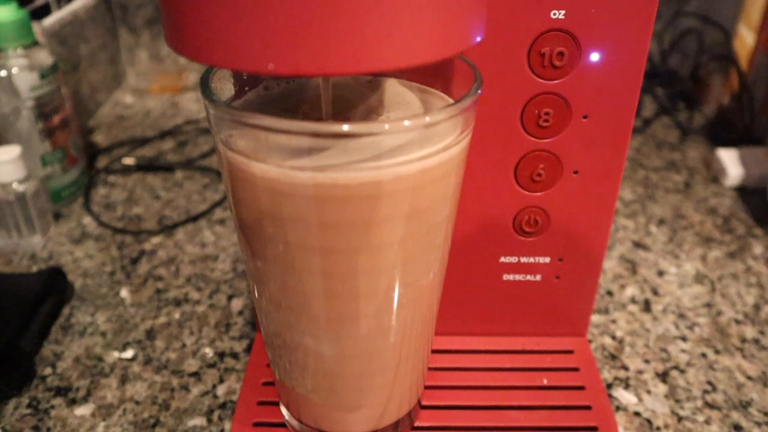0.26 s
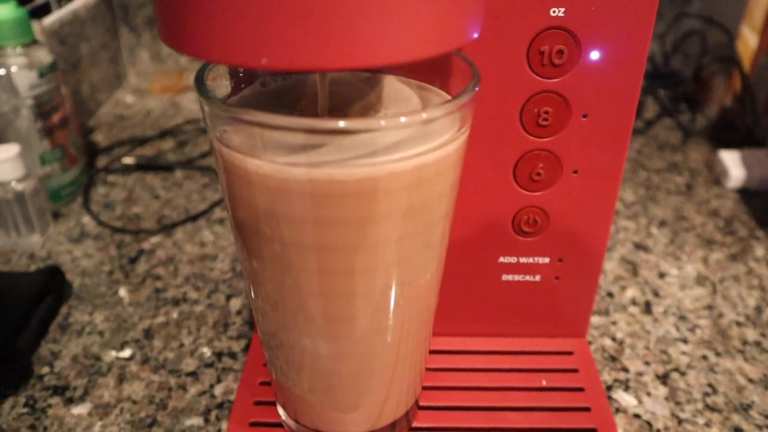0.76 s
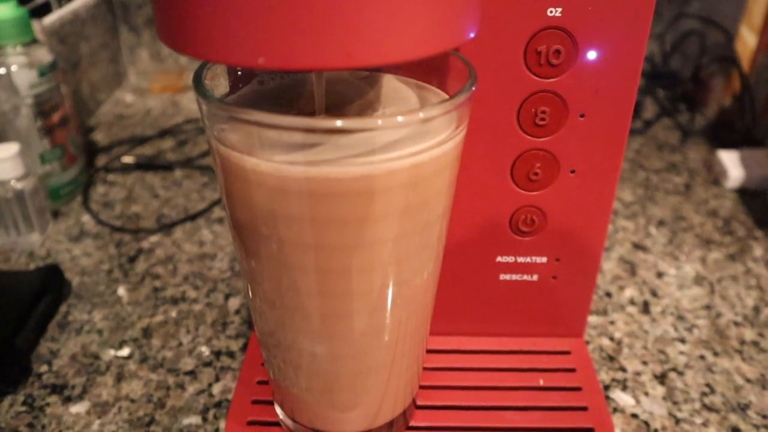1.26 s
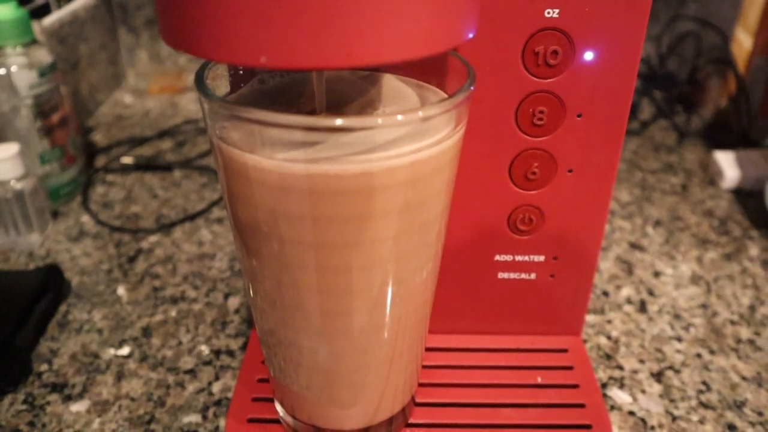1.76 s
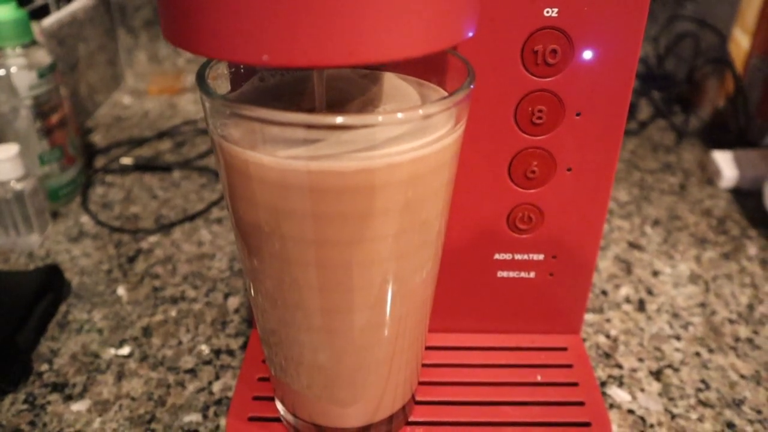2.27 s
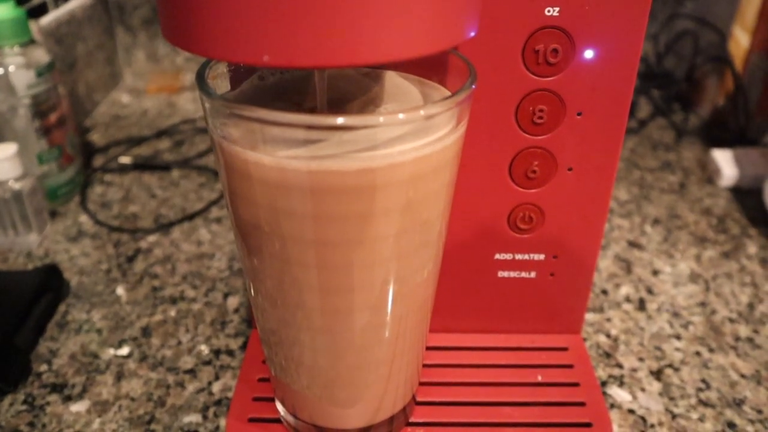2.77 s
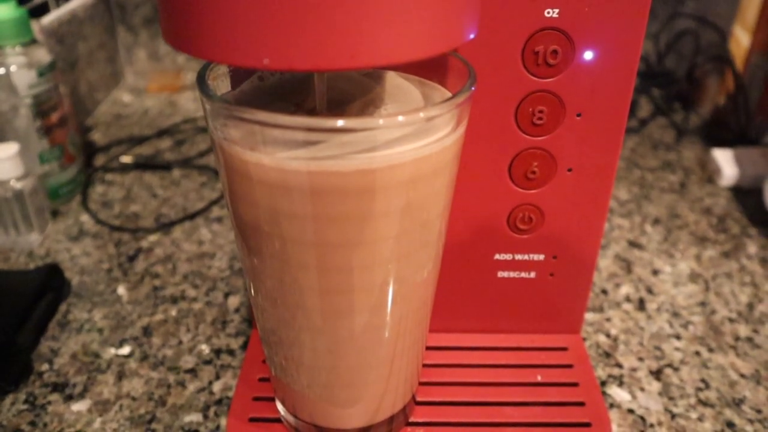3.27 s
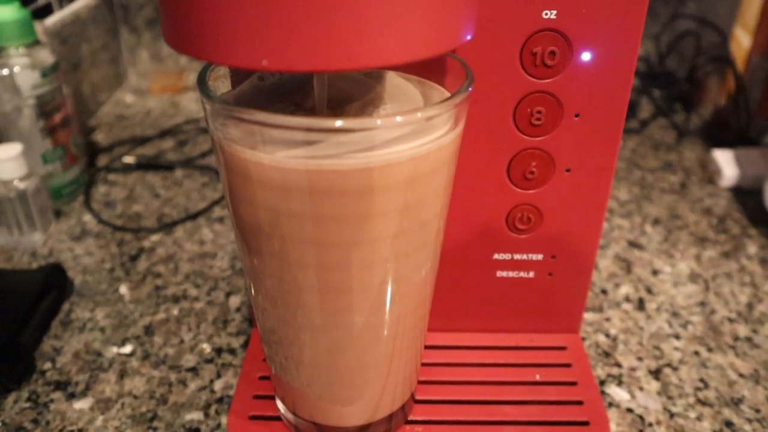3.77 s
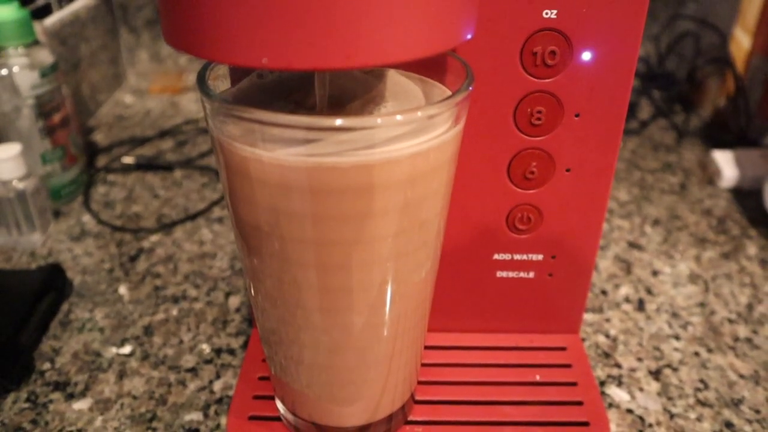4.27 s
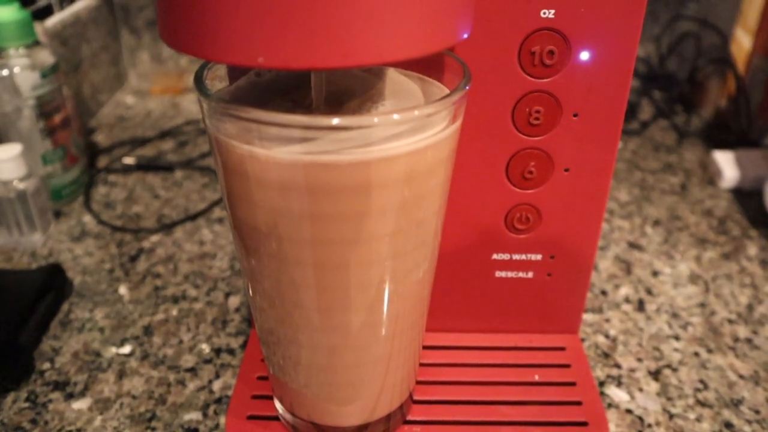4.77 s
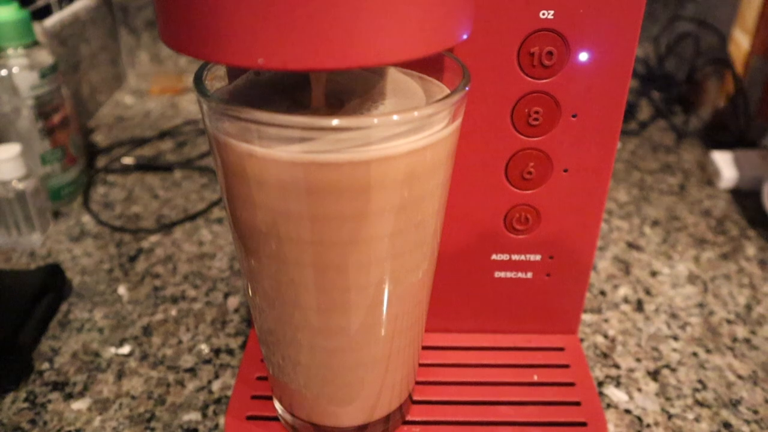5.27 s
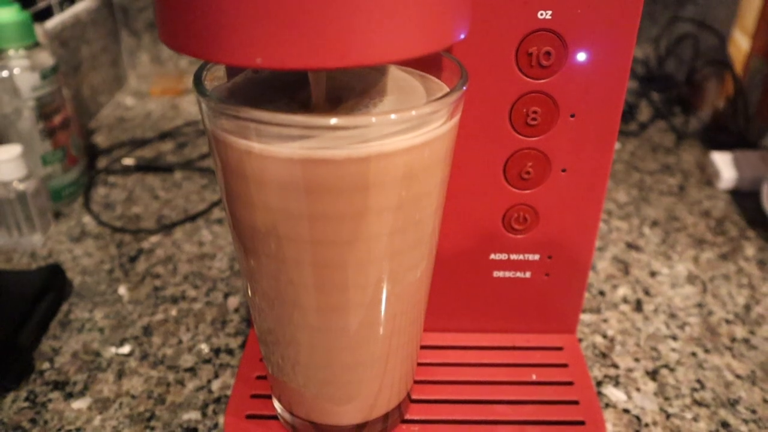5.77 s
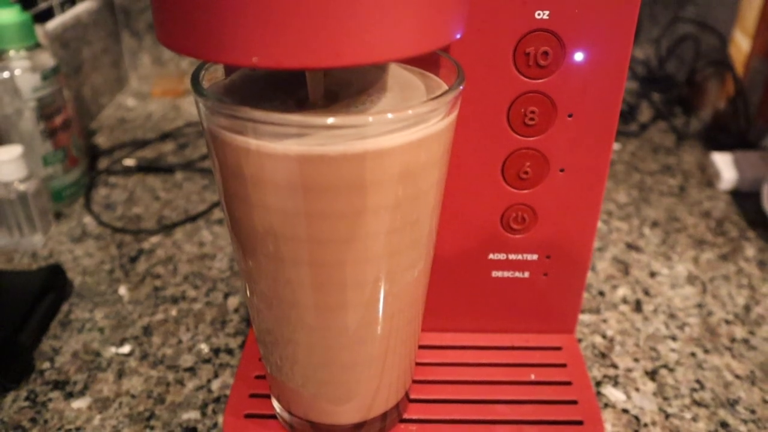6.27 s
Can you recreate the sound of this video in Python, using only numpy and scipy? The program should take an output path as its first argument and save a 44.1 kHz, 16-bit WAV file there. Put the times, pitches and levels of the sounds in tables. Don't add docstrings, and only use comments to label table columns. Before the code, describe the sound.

A small coffee machine fills a glass, heard very close in a lightly reflective kitchen. First comes a steady, low, buzzing pump with a fine plastic rattle, soft water wash and fridge hum, plus isolated clicks. Then a cluster of snaps stops it and an air pump surges in, buzzing and whining, with hissing breakthroughs. Bubbles gurgle hollowly and spits grow denser and louder, without a final stop.

```python
import sys
import numpy as np
from scipy import signal
from scipy.fft import rfft, irfft, next_fast_len
from scipy.io import wavfile

SR = 44100
rng = np.random.default_rng(int(sys.argv[2]) if len(sys.argv) > 2 else 0)


def nominal_scale(level):
    x = np.asarray(level, float) / 20
    return 10 ** x


def pcm_store(signal):
    levels = np.round(np.clip(np.atleast_2d(signal), -1, 1) * 32767)
    wavfile.write(sys.argv[1], SR, levels.astype(np.int16).T)


N = 287071
T = np.arange(N) / SR

# place_in_turn (0-1), level_db
AIR_STROKES = [(.40, 11.5), (.75, 4.5), (.06, -3)]
# centre_s, whistle_db, length_s, hollow_db
SPLUTTERS = [
    (3.558, -30.5, 0.024, -32),
    (3.668, -31.5, 0.013, -44),
    (3.758, -38, 0.014, -46),
    (4.908, -43.5, 0.084, -57),
    (5.768, -46, 0.0089, -36),
    (5.85, -57, 0.016, -49),
    (6.057, -63, 0.034, -47),
]
# pitch_hz, level_db
REFLECTED = [(50, -44), (120, -26), (300, -15), (800, -10), (1300, -7), (1900, -2), (2900, -8), (3600, -5),
             (12000, -5)]


def evened(x):
    return x / np.sqrt(np.mean(x ** 2) + 1e-20)


def read(points, hz):
    f, value = np.transpose(points)
    return np.interp(np.log(hz + 1), np.log(f + 1), value)


def play(rows):
    s, *columns = np.transpose(rows)
    return [np.interp(T, s, c) for c in columns]


def fade(start, stop, edge):
    return np.clip(np.minimum(T - start, stop - T) / edge, 0, 1)


def shape(x, gain):
    size = next_fast_len(N)
    spectrum = rfft(x, size) * gain(np.fft.rfftfreq(size, 1 / SR))
    return irfft(spectrum, size)[..., :N]


def colour(x, points):
    return evened(shape(x, lambda hz: nominal_scale(read(points, hz))))


def ring(x, hz, width):
    return signal.lfilter(*signal.iirpeak(hz, hz / width, SR), x)


def resonate(x, hz, width):
    turn = np.exp(2j * np.pi * np.cumsum(hz * np.ones(N)) / SR)
    r = np.exp(-np.pi * width / SR)
    return 2 * (turn * signal.lfilter([1 - r], [1, -r], x / turn)).real


def body(x, modes):
    return evened(sum((-1) ** k * nominal_scale(db) * ring(x, hz, w) for k, (hz, w, db) in enumerate(modes)))


def drift(rate):
    coarse = T[::100]
    hz = np.fft.rfftfreq(len(coarse), 100 / SR)
    spectrum = rfft(rng.standard_normal(len(coarse))) * (hz > 0) / (1 + (hz / rate) ** 2)
    return np.interp(T, coarse, evened(irfft(spectrum, len(coarse))))


def strokes(turns, pattern, scatter_db):
    hits = sum(nominal_scale(db) * np.diff(np.floor(turns - place), prepend=-1).clip(0, 1) for place, db in pattern)
    return hits * nominal_scale(scatter_db * rng.standard_normal(N))


def scattered(own):
    a, b, c = rng.standard_normal((3, N))
    return np.sqrt(1 - own) * a + np.sqrt(own) * np.array([b, c])


def puffs(hits, seconds, own=0):
    level = signal.lfilter([1], [1, -np.exp(-1 / (seconds * SR))], hits)
    return level * (scattered(own) if own else rng.standard_normal(N))


def orders(turns, multiples, levels_db, waver_db):
    return sum(np.sqrt(2) * nominal_scale(db + waver_db * drift(8.1)) * np.cos(2 * np.pi * (k * turns + rng.random()))
               for k, db in zip(multiples, levels_db))


def swells(rows, steady_db):
    t = T[::40]
    power = nominal_scale(steady_db) ** 2
    power = power + sum((nominal_scale(row[1]) * np.exp(-((t - row[0]) / row[2]) ** 2)) ** 2 for row in rows)
    return np.interp(T, t, np.sqrt(power))


def above_1700(x):
    dull = signal.lfilter(*signal.butter(2, 1700, fs=SR), x)
    return dull, x - dull


def water_pump():
    # start_s, turns_per_s
    shaft_speed = [(0.2, 25.01), (0.4, 24.83), (1.2, 24.49), (2.8, 23.98), (3.0, 24.25), (3.4, 24.92)]
    # multiples of the shaft speed, then their level_db
    multiples = [3, 6, 15, 16, 18, 20, 21, 23, 29, 30, 38]
    hum_db = [-48, -47, -55, -52.5, -63, -62, -49, -56.5, -57, -73, -65]
    # place_in_turn (0-1), level_db
    valves = [(.81, 0), (.46, -5.5), (.155, -6.5)]
    # pitch_hz, level_db (per Hz)
    wash_tone = [(88, -6), (150, -24), (193, -13), (505, -5.5), (991, -11.5), (1250, -15.5), (2550, -22),
                 (2920, -18), (4460, -31.5), (5300, -30), (11700, -47.5), (12900, -71), (15000, -91)]
    turns = np.cumsum(play(shaft_speed)[0]) / SR
    hum = orders(turns, multiples, hum_db, 0.36)
    hits = strokes(turns, valves, 0.19)
    knock = evened(ring(ring(hits + .03 * puffs(hits, .002), 1310, 300), 1310, 500))
    wash = colour(rng.standard_normal(N), wash_tone) * nominal_scale(0.29 * drift(9.9))
    running = fade(-1, 3.52, 0.058)
    return (hum + nominal_scale(-46) * knock) * running + nominal_scale(-43.5) * wash * (0.47 + 0.55 * fade(-1, 4.12, 0.42))


def rattle():
    # centre_s, level_db, length_s
    runs = [
        (.14, -53.5, 0.036),
        (.44, -52, 0.097),
        (.7, -57, 0.027),
        (1.2, -54, 0.062),
        (1.66, -56.5, 0.16),
        (2.24, -54.5, 0.21),
        (2.54, -57, 0.016),
        (3.17, -55, 0.12),
        (4.42, -57, 0.13),
    ]
    # pitch_hz, width_hz, level_db
    housing = [(1950, 210, -0.5), (2783, 18, 0.5), (2960, 126, -2), (4170, 190, -1), (4700, 43, -2),
               (5194, 280, -1.5), (5540, 110, -3.5), (5920, 370, -6.5), (7500, 2900, -14.5),
               (11750, 2900, -16)]
    ticks_per_s, steady_db, stop_s, flutter_db = 93, -54, 4.46, 1.2
    hits = strokes(np.cumsum(ticks_per_s * (1 + .03 * drift(15.))) / SR, [(0, 0)], 1.0)
    ticks = .75 * evened(puffs(hits, .0011, .9)) + .75 * evened(hits)
    ticks = ticks + (.25 + .6 * fade(3.4, 9, .2)) * scattered(.8)
    level = swells(runs, steady_db) * nominal_scale(-2.5 * fade(3.2, 9, 0.037)) * nominal_scale(flutter_db * drift(45.0))
    level *= 0.2 + 0.89 * fade(-1, stop_s, 0.024)
    return nominal_scale(4.5) * level * signal.lfilter(*signal.butter(8, 12000, fs=SR), body(ticks, housing))


def drone():
    # pitch_hz, level_db (per Hz)
    rumble_tone = [(11, -51), (18, -24), (32, -36), (59, 3.5), (91, -5), (114, 4.5), (129, -15), (172, -11),
                   (226, -10), (268, -13), (400, -14.5), (520, -63), (880, -120)]
    hum_hz, hum_db, rumble_db = 121.3, -41, -40.5
    hum = np.sqrt(2) * nominal_scale(hum_db + 0.11 * drift(2.4)) * np.cos(2 * np.pi * hum_hz * T)
    return hum + nominal_scale(rumble_db) * colour(rng.standard_normal(N), rumble_tone)


def clacks():
    # start_s, peak_db, pitch_hz, time_to_fall_60_db_s
    snaps = [(1.322, -18, 1920, 0.018), (1.3222, -19, 700, 0.013), (3.074, -18, 1950, 0.023),
             (3.333, -38, 1240, 0.033), (3.345, -41, 1290, 0.02), (3.358, -17, 1310, 0.1),
             (3.365, -14, 1250, 0.021), (3.406, -33, 1000, 0.013), (3.422, -35, 1240, .015),
             (3.438, -35, 1200, .015), (3.447, -23, 1000, 0.012), (3.456, -33, 1260, 0.012),
             (3.467, -40, 1000, .015), (3.474, -39, 1250, 0.012), (3.484, -16, 1350, 0.02)]
    out, t = np.zeros(N), np.arange(4000) / SR
    band = signal.butter(3, [800, 3000], "bandpass", fs=SR)
    for s, db, hz, t60 in snaps:
        crack = 2.8 * signal.lfilter(*band, rng.standard_normal(len(t)))
        tone = 1.4 * np.sin(2 * np.pi * hz * t)
        out[round(s * SR):][:4000] += nominal_scale(db - 14.0 - 60 * t / t60) * (tone + crack)
    return out


def spits_and_spray():
    # start_s, peak_db, low_db (body relative to the hiss)
    flicks = [(3.331, -37, -10), (3.3444, -47, -10), (3.3645, -39, -13), (3.4077, -48, -14),
              (3.483, -45, -14), (3.5204, -49, -10), (3.5538, -48, -8), (3.5778, -44, -13),
              (3.6451, -43, -10), (3.7444, -42, -12), (3.7833, -43, -19), (3.7973, -56, -10),
              (3.8224, -43, -10), (3.8669, -44, -12), (3.898, -54, -10), (4.0302, -44, -10),
              (4.0801, -42, -10), (4.2183, -48, -15), (4.2423, -52, -13), (4.356, -42, -12),
              (4.377, -51, -10), (4.3999, -44, -10)]
    # (body below 3 kHz, relative)
    spits = [(4.716, -45, -8), (4.771, -40, -5), (4.7938, -44, -6), (4.840, -50, -8), (4.863, -45, -12),
             (4.876, -39, -9), (4.956, -39, 3), (5.004, -33, -13), (5.02, -36, 8), (5.033, -37, 12),
             (5.047, -44, 16), (5.057, -40, 9), (5.088, -30, 6), (5.118, -31, 7), (5.196, -32, -3),
             (5.153, -30, 0), (5.205, -32, 7), (5.2344, -36, 0), (5.257, -24.5, 2), (5.359, -46, 0),
             (5.424, -28, 5.5), (5.428, -48, -14), (5.4504, -24.5, 2.5), (5.548, -32, 7), (5.554, -35, -9),
             (5.586, -58, -8), (5.6136, -29.5, 6.5), (5.62, -35, 6), (5.637, -27, -2), (5.662, -44, -8),
             (5.73, -58, -10), (5.7624, -16, -13), (5.766, -22, -14), (5.794, -28.5, 3.5),
             (5.8425, -32, -13), (5.856, -32, -10), (5.901, -33, -11), (5.942, -33, -12),
             (5.9896, -27.5, -18), (6.015, -37, 9.5), (6.035, -43, -2), (6.053, -32, 3), (6.066, -40, 7),
             (6.088, -27, -2), (6.1155, -27, -3), (6.1904, -20.5, -4), (6.2416, -35, -6),
             (6.257, -22.5, -12), (6.27, -32, -11), (6.345, -37, -5), (6.365, -39, 1), (6.411, -50, -8),
             (6.439, -37, -14), (6.452, -35, -13), (6.464, -44, -8)]
    # pitch_hz, level_db (per Hz)
    spit_tone = [(1760, -27), (3000, -6.5), (4600, -9), (5200, -2.5), (5900, -7.5), (7900, -15.5),
                 (10500, -12.5), (12500, -17.5), (15500, -30)]
    t60_s, shorter_per_db = 0.022, 0.1372
    drizzle_db, first_burst = -58, (5.095, -55, 0.074)
    high, low = np.zeros((2, N))
    for s, db, low_db in flicks + spits:
        t60 = t60_s * np.exp(-shorter_per_db * (db + 28.5))
        age = np.maximum(T[round(s * SR):][:8000] - s, 0)
        spit = nominal_scale(db - 60 * np.maximum(age - .002, 0) / t60) * np.minimum(age / 0.0013, 1)
        high[round(s * SR):][:8000] += spit
        low[round(s * SR):][:8000] += spit * nominal_scale(low_db)
    grains = puffs((rng.random(N) < 260 / SR) * nominal_scale(9 * rng.random(N)), 0.002)
    spray = colour(evened(grains) + 0.13 * scattered(0.082), spit_tone)
    spray = nominal_scale(9.0) * swells([first_burst], drizzle_db) * fade(4.5, 9, 0.45) * spray
    hiss = colour(scattered(1.0), spit_tone)
    splat = evened(ring(scattered(0.31), 1000, 800))
    return spray + nominal_scale(-7.0) * high * hiss + nominal_scale(-4.5) * low * splat


def froth():
    # centre_s, level_db, length_s, pitch_hz
    gurgles = [(3.37, -26, 0.036, 570), (3.55, -44, 0.22, 560), (3.84, -42.5, 0.016, 554),
               (3.96, -45, 0.03, 590), (4.22, -53, .03, 546), (4.41, -50, .04, 580),
               (4.71, -44, 0.039, 616), (4.8, -51, .02, 554), (4.91, -41, 0.065, 565),
               (5.04, -36.5, 0.04, 572), (5.18, -43, 0.2, 553), (5.31, -32, 0.021, 590),
               (5.43, -42.5, 0.027, 553), (5.62, -49, 0.034, 580), (5.77, -44.5, 0.061, 540),
               (6.11, -45.5, 0.22, 568), (6.27, -32.5, 0.025, 561), (6.46, -45.5, 0.1, 583),
               (6.51, -35, 0.017, 580)]
    simmer_db, splash = -54.5, (5.035, -33, 0.022)
    hz = play(gurgles)[-1]
    bubbles = evened(resonate(resonate(rng.standard_normal(N), hz, 62), hz, 135))
    out = nominal_scale(1.0) * swells(gurgles, simmer_db) * bubbles * fade(3.36, 9, 0.072)
    return out + swells([splash], -78) * evened(ring(ring(rng.standard_normal(N), 820, 160), 750, 400))


def housing_roar(turns, blow):
    # pitch_hz, level_db (per Hz)
    roar_tone = [(120, -39), (200, -63), (328, 0.5), (361, -40), (397, -13), (504, -10), (554, -4),
                 (825, -1.5), (938, -0.5), (1050, 4.5), (1560, -5), (1890, -7), (2860, -8.5), (3250, -10),
                 (9000, -41), (11700, -65), (19800, -120)]
    # pitch_hz, width_hz, level_db
    casing = [(580, 120, -2), (834, 63, 0), (940, 48, 4), (1010, 76, -6), (1460, 170, 5)]
    # multiples of the shaft speed, then level_db with a wet and with a dry capsule
    multiples = [3, 9, 15, 16, 18, 20, 22, 24, 26, 27, 29, 30, 32, 33, 35, 36, 39, 40]
    wet_db = [-21, -17.5, -18, -19, -14.5, -16.5, -8.5, -32, -14, -10.5, -11.5, -12.5, -13.5, -46, -8.5,
              -18.5, -44, -30]
    dry_db = [-20, -16.5, -17, -12, -10, -10, -15, -25, -21, -10, -25, -17, -40, -7.5, -23, -9, -17, -20]
    # centre_s, level_db, length_s
    surges = [
        (3.37, -25, 0.0084),
        (3.55, -39, 0.12),
        (3.68, -36.5, 0.061),
        (3.76, -44, 0.027),
        (4.9, -45, 0.041),
        (5.035, -37, .03),
        (5.77, -34, 0.012),
    ]
    steady_db, dry_from_s, drying_s = -36.5, 5.14, 1
    dryness = fade(dry_from_s, 9, drying_s)
    roar = colour(blow, roar_tone) + 0.16 * body(blow, casing)
    levels_db = [w + (d - w) * dryness for w, d in zip(wet_db, dry_db)]
    roar += fade(3.43, 9, .2) * orders(turns, multiples, levels_db, 0.87)
    dull, treble = above_1700(roar)
    roar = dull * (0.6 + 0.33 * fade(3.5, 9, 0.08)) + treble * fade(3.48, 9, 0.082)
    return nominal_scale(-0.17) * swells(surges, steady_db) * roar


def grunt(blow):
    tone_swell, cavity_swell = (3.47, -41.5, 0.07), (3.494, -41, 0.14)  # centre_s, level_db, length_s
    tone = evened(np.sin(2 * np.pi * 238 * T) + 0.23 * evened(ring(blow, 243, 40)))
    cavity = evened(ring(blow, 420, 150))
    return (swells([tone_swell], -70) * tone + swells([cavity_swell], -69) * cavity) * fade(3.35, 3.75, 0.017)


def nozzle_whistle(turns):
    clear_s, start_db, gain_db_per_s, top_db = 3.85, -43.5, 2, -40.5
    dry_db = np.minimum(start_db + gain_db_per_s * (T - clear_s), top_db)
    blown = swells(SPLUTTERS, -50) + nominal_scale(dry_db + .8 * drift(6.)) * fade(clear_s, 9, .04)
    hits = strokes(turns + .0025 * drift(30.), AIR_STROKES, 1.2)
    even = strokes(turns, [(p, 3 + db / 2) for p, db in AIR_STROKES], 1.2)
    hits = even + (hits - even) * fade(4.2, 9, .9)
    drive = evened(hits) + .5 * evened(puffs(hits, .006))
    whistle = evened(ring(ring(drive, 2888, 95), 2880, 350))
    whistle += 0.14 * evened(ring(drive, 3960, 140)) + 0.053 * evened(ring(drive, 5130, 260))
    return blown * whistle * fade(3.51, 9, 0.037)


def hollow_nozzle(hits):
    boomed = swells([(s, db, length) for s, _, length, db in SPLUTTERS], -46.5) * nominal_scale(1 * drift(32.0))
    hollow = evened(ring(ring(puffs(hits, 0.0031, 0.67), 2090, 400), 2130, 480))
    return nominal_scale(3.5) * boomed * hollow * fade(3.51, 9, 0.022)


def wet_sputter(hits):
    # pitch_hz, width_hz, level_db
    wet_modes = [(3930, 410, 1), (4480, 170, -2.5), (5470, 270, -2.5)]
    # centre_s, level_db (above the steady sputter), length_s
    spurts = [
        (3.56, 12.5, 0.05),
        (3.6, 2, .01),
        (3.665, 5, 0.036),
        (3.72, -4, .02),
        (3.78, -9, .015),
        (3.83, 5, .01),
        (3.9, 6.5, 0.082),
        (4.03, -3, 0.034),
    ]
    start_db, fall_db_per_s, waver_db = -53.5, 4, 1.5
    spatter = puffs(hits, 0.0035, 0.59)
    wet = sum(nominal_scale(db + waver_db * drift(6.2)) * evened(ring(ring(spatter, hz, w), hz, 2 * w))
              for hz, w, db in wet_modes)
    return nominal_scale(start_db - fall_db_per_s * (T - 3.5)) * swells(spurts, -4.5) * wet * fade(3.51, 9, 0.031)


def air_pump():
    # start_s, turns_per_s
    shaft_speed = [(3.5, 43.447), (3.7, 43.6), (3.9, 43.14), (4.1, 44.13), (4.3, 43.53), (4.55, 43.44),
                   (4.7, 43.14), (4.9, 43.07), (5.1, 43.85), (5.3, 44.3), (5.6, 43.92), (5.9, 44.0),
                   (6.3, 44.1)]
    turns = np.cumsum(play(shaft_speed)[0]) / SR
    late = strokes(turns - .01, [(p, db / 3) for p, db in AIR_STROKES], 2.66)
    slap = rng.standard_normal(600) * np.exp(-T[:600] / .003)
    blow = .25 * evened(signal.oaconvolve(late, slap)[:N]) + 0.59 * evened(puffs(late, 0.0066))
    blow += .5 * rng.standard_normal(N)
    out = nozzle_whistle(turns) + housing_roar(turns, blow) + hollow_nozzle(late)
    out = out + wet_sputter(late) + grunt(blow)
    clog_s, clog_db, clog_length_s = 3.825, -4.5, 0.024
    clog = nominal_scale(clog_db * np.exp(-((T - clog_s) / clog_length_s) ** 2))
    dull, treble = above_1700(out)
    return (dull + clog * treble) * fade(3.352, 9, 0.031)


def kitchen(x):
    t = np.arange(8000) / SR
    taps = (rng.random((2, len(t))) < .05) * rng.choice([-1., 1.], (2, len(t)))
    taps = taps * nominal_scale(-60 * t / .07) * (t > .002)
    wet = signal.oaconvolve(x[None], taps / np.linalg.norm(taps, axis=1, keepdims=True), axes=1)[:, :N]
    return shape(wet, lambda hz: nominal_scale(read(REFLECTED, hz)))


def ports(x):
    # pitch_hz, phase_radians
    lead = [(0, 0), (900, 0), (1380, -.45), (1700, 0), (2200, 2), (2900, 1.4), (5500, 1.9), (9500, 2.3),
            (11400, 2.8), (12500, 3.0)]
    # pitch_hz, level_db
    balance = [(180, 0.0), (700, -1), (1600, 4), (2500, -3), (2900, 5), (5500, 0), (8500, 3), (15000, 1.0)]

    def half(hz):
        return nominal_scale(read(balance, hz) / 2) * np.exp(.5j * np.interp(hz, *np.transpose(lead)))
    return shape(x, lambda hz: np.array([half(hz), 1 / half(hz)]))


def scene():
    # pitch_hz, level_db (per Hz)
    ambience = [(53, -61), (90, -82), (189, -6.5), (366, -1), (731, -1.5), (865, 0), (1100, -3), (1430, 2),
                (2420, -31)]
    dry = water_pump() + rattle() + drone() + clacks() + spits_and_spray() + froth() + air_pump()
    both = ports(dry) + kitchen(dry.mean(0))
    both = shape(both, lambda hz: 1 / np.sqrt(1 + nominal_scale(read(REFLECTED, hz)) ** 2))
    return both + nominal_scale(-47.5) * colour(rng.standard_normal((2, N)), ambience)


def roll_off(x):
    return signal.sosfilt(signal.butter(12, 15650, fs=SR, output="sos"), x)


def record(dry):
    # pitch_hz, level_db (per Hz)
    self_noise = [(3000, -30), (6500, -4), (9000, 0), (13000, -1), (13700, -25), (16000, -50)]
    # pitch_hz, level_db
    shared_loss = [(7000, 0), (9000, -2.5), (11900, -3), (12500, -8), (14000, -5)]
    # pitch_hz, level_db
    microphone = [(800, 0), (1400, -1), (2000, 2.5), (4000, 4), (8000, 4.5), (11800, 5.5), (12500, 1.5),
                  (14500, 0), (16000, -9)]
    noisy = dry + nominal_scale(-68) * colour(rng.standard_normal((2, N)), self_noise)
    lost = shape(noisy.mean(0), lambda hz: 1 - nominal_scale(read(shared_loss, hz)))
    mix = shape(noisy - lost, lambda hz: nominal_scale(read(microphone, hz)))
    return roll_off(mix)


dry = scene()
out = record(dry)
pcm_store(out)
```